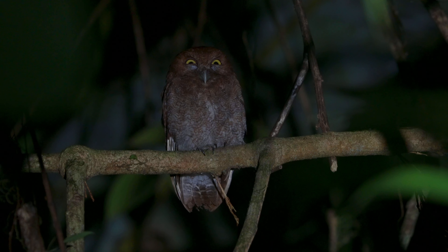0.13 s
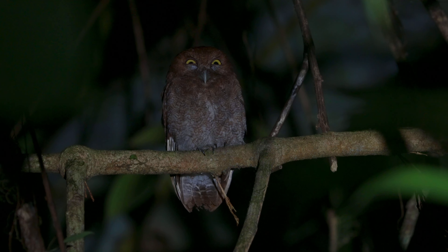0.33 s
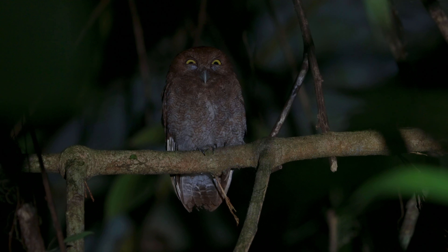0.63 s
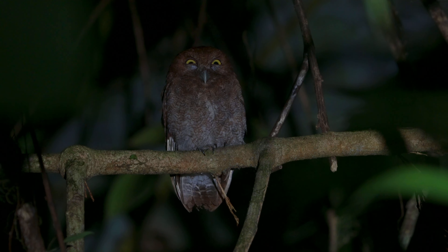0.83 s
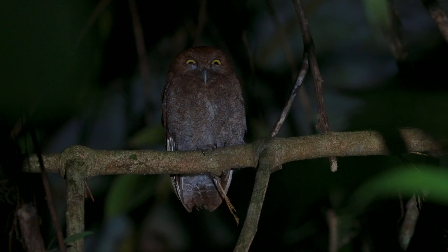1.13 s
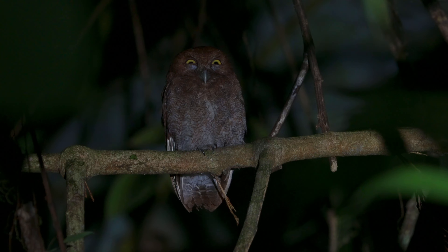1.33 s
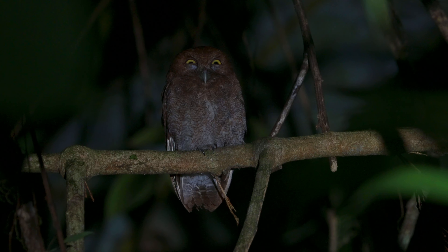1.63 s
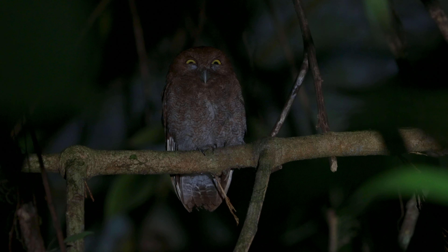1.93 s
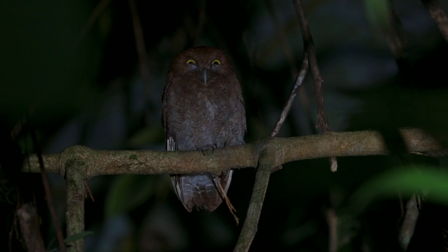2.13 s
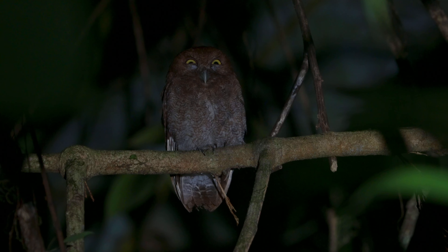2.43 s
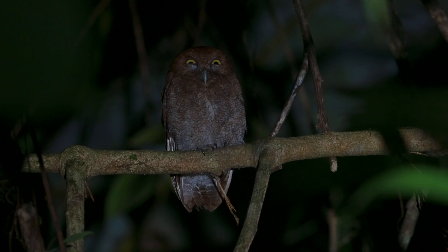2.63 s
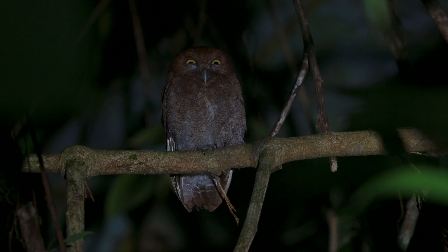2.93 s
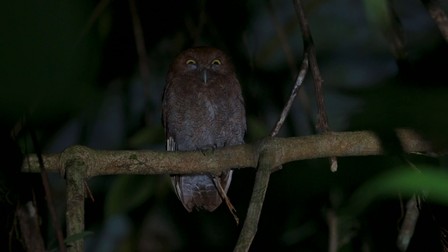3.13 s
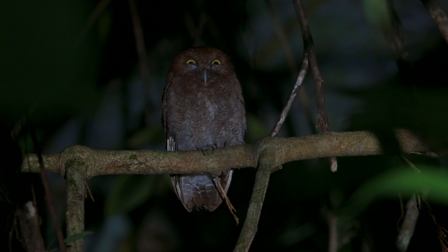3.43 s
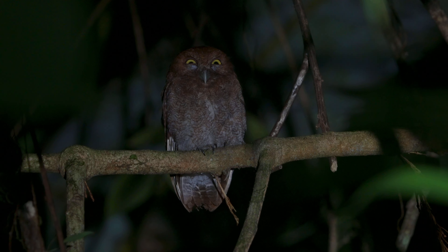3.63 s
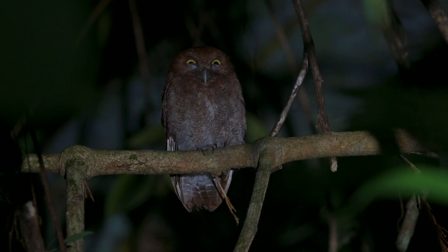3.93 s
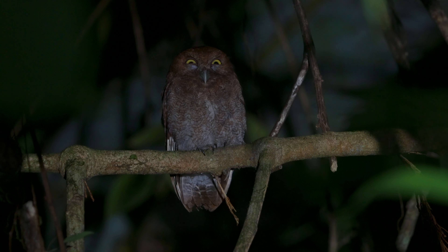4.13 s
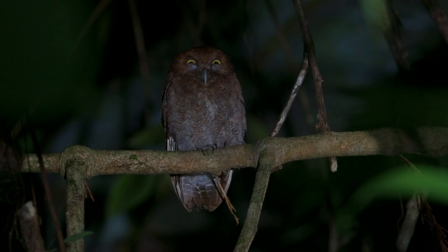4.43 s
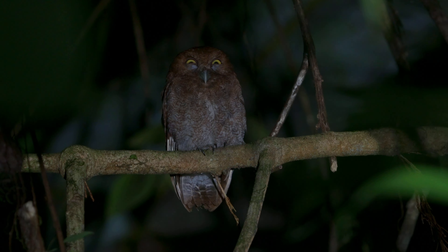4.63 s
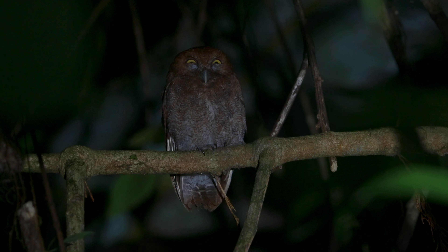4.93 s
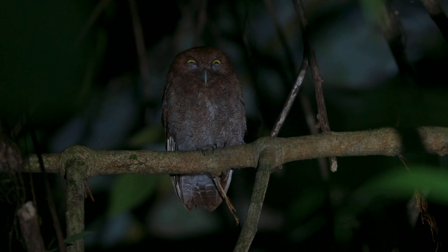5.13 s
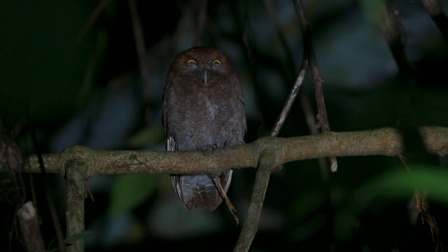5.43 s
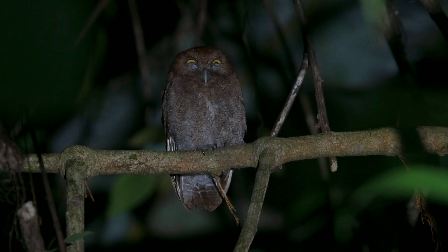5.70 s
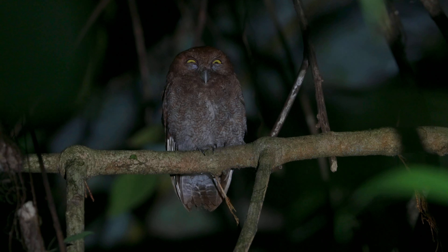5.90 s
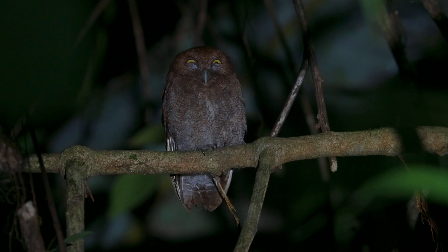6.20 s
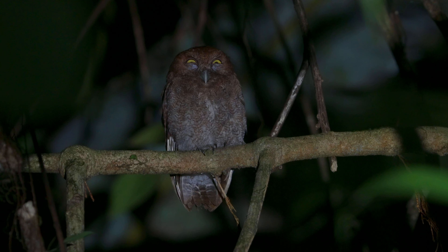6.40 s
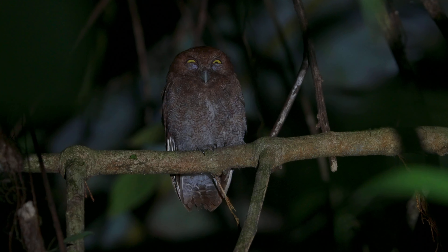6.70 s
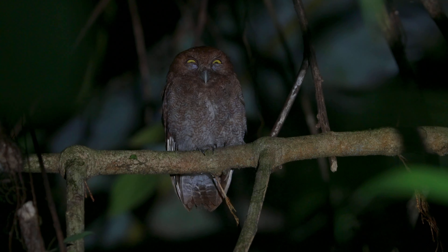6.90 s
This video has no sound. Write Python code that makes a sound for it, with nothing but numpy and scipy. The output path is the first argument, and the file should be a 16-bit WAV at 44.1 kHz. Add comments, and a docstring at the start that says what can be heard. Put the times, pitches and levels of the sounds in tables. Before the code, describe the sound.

A night forest rings with a dense, high, fluttering chorus of far crickets. Nearer crickets add brief pure trills that overlap irregularly on both sides, and thin, very high buzzes rise among them. Faint quavering bird notes come through the trees. From about three seconds a katydid on the right chirps in short, rough bursts, loudest and most regular toward the end. Wide stereo outdoors, with leafy scatter and a low hush; the perched owl stays silent.

```python
"""Tropical forest at night

Far crickets, summed noise bands with fluttering level, shimmer between 4 and 8 kHz.
Nearer crickets trill: pure wing tones chopped by wing beats. A slow far one repeats sliding notes.
A katydid on the right sweeps its pitch in short chirps; others make very high, rising, noise-blurred buzzes.
A far bird whistles faintly in quavering sines, and twigs tick as decaying noise.
Random echo tails scatter these nearer voices over shaped noise: a low hush, a hum and a hiss."""
import sys
import numpy as np
from scipy import signal
from scipy.fft import rfft, irfft, next_fast_len
from scipy.io import wavfile
from scipy.ndimage import map_coordinates

SR = 44100
rng = np.random.default_rng(int(sys.argv[2]) if len(sys.argv) > 2 else 0)


def generate_wav(sig):
    """Save sig (samples, or channels by samples) to the path in sys.argv[1] as 16-bit PCM at SR."""
    pcm = np.round(np.clip(np.atleast_2d(sig).T, -1, 1) * 32767).astype(np.int16)
    wavfile.write(sys.argv[1], SR, pcm)


N = 311346  # samples

# hush spectrum: (frequency [Hz], relative level [dB])
AIR_SPECTRUM = [(12, -34), (20, -3.5), (133, -5), (461, -7.5), (536, -2), (596, -4.5), (724, -7.5),
                (1090, -9), (1380, -8), (1780, -11.5), (2680, -12), (3050, -15.5), (3400, -13.5),
                (4420, -43), (7480, -120)]
# hiss spectrum: (frequency [Hz], relative level [dB])
HISS_SPECTRUM = [(2500, -36), (3500, 7), (8200, 28.5), (9000, -35), (11000, 5.5), (14000, 7.5), (15000, -5)]
# far hum bands: (centre [Hz], spread [Hz], level [dB])
HUM_BANDS = [(541, 10.8, -69), (626, 21, -81.5), (1383, 31, -74)]
# hush likeness between ears: (frequency [Hz], left-right correlation [-1 to 1])
EAR_LIKENESS = [(30, .98), (80, 0.94), (170, 0.73), (350, 0.32), (800, 0.11), (3000, 0.015)]
# far cricket species: (wing tone [Hz], spread [Hz], mean level [dB], pulse rate [1/s])
FAR_SPECIES = [(3875, 96, -66, 35), (4100, 117, -60, 33), (4393, 73, -55, 54), (4603, 29, -48.5, 83),
               (4775, 61, -45, 78), (5060, 84, -47, 80), (5512, 100, -41, 47), (6110, 160, -49.2, 81),
               (6398, 89, -41.5, 19), (6618, 30, -41.7, 26), (6804, 34, -42, 47), (7010, 85, -39.7, 100),
               (7200, 160, -46, 150), (7530, 33, -46.3, 31), (7585, 129, -39, 28), (7710, 140, -51, 52),
               (8330, 17, -62.5, 40)]
# slow swell of the high far species, shape only: (time [s], level [dB])
HIGH_SWELL = [(0.0, -37), (0.37, -34.5), (2.32, -37.5), (2.44, -34.5), (3.13, -37.5), (3.6, -36),
              (7.06, -36.5)]
# bird whistles: (start [s], length [s], pitch [Hz], level [dB])
BIRD_WHISTLES = [(0.947, .48, 2720, -64.5), (1.216, .17, 4200, -51), (4.153, 0.16, 4200, -54),
                 (4.58, .15, 3780, -57.5), (4.848, 0.076, 2480, -58.5), (4.954, 0.054, 2466, -56),
                 (6.117, .3, 3804, -59)]
# twig ticks: (time [s], level at onset, before scatter [dB])
TWIG_TICKS = [(4.3, -56), (4.396, -42.5)]
# near crickets: (wing tone [Hz], pulse rate [1/s], pulse sharpness [-], pitch sag within a pulse [Hz],
# pitch jitter [Hz], left minus right [dB], scatter against direct [dB])
CRICKET_VOICES = [(5293, 99, 1.05, 15, 8, 3.5, -4), (5594, 107.5, 2.3, 42, 11, -3, -1),
                  (5570, 107.5, 2, 42, 22, -2, 3), (4825, 62, .7, 0, 18, 1, 0),
                  (7058, 52, .4, 0, 14, -1.5, -3), (6796, 47, .55, 0, 32, -2, 0),
                  (6179, 30, .3, 0, 22, -7, -2)]
# trill repeated by each near cricket: (length [s], level [dB], swell time [s])
CRICKET_TRILLS = [(0.293, -38, .012), (0.29, -36, 0.025), (.27, -40, 0.048), (.29, -45.5, .04),
                  (0.278, -40, 0.022), (.38, -44, .06), (.13, -46, .025)]
# one list of trills per near cricket, the last strictly periodic: (start [s])
TRILL_STARTS_S = [
    [-.2, .44, 1.77, 3.23, 3.96, 4.67, 5.65, 6.83],
    [.32, 1.92, 2.73, 3.38, 4.77, 5.76],
    [.2, 1.15, 2.07, 2.38, 4.35, 4.62, 6.58],
    [.55, 1.26, 2.65, 3.33, 5.3, 5.58, 6.5],
    [.51, 2.36, 3.65, 5.11, 6.5],
    [.25, 1.38, 2.42, 3.35, 3.8, 5, 5.48, 6.6],
    np.arange(start=.13, stop=N / SR, step=.667),
]
# high buzzes: (start [s], drive level [dB], singer)
BUZZ_EVENTS = [(-.17, -36, "two-toned"), (0.376, -58.5, "slow"), (1.171, -62, "slow"),
               (1.416, -54.5, "plain"), (1.597, -50, "shrill"), (2.252, -55, "slow"),
               (2.637, -51.5, "shrill"), (3.129, -38, "two-toned"), (3.52, -54.5, "shrill"),
               (4.108, -55, "slow"), (4.706, -59, "shrill"), (5.238, -57, "slow"), (5.268, -49, "shrill"),
               (5.838, -51, "shrill"), (6.352, -55.5, "slow"), (6.632, -38, "plain")]
# by singer: (buzz length [s], final pitch [Hz], upper wing mode [dB], pitch settling time [s])
BUZZ_SINGERS = {"two-toned": (0.276, 12269.5, -10.5, 0.07), "slow": (0.44, 12520, -18, 0.18),
                "shrill": (.3, 13330, -31, 0.03), "plain": (.33, 12300, -34, 0.17)}
# katydid chirps: (start [s], length [s], level before leaf echoes [dB])
KATYDID_CHIRPS = [(2.425, .11, -56), (3.041, .1, -39), (3.507, 0.21, -57.5), (3.836, 0.096, -37),
                  (4.096, .11, -34.5), (4.388, 0.095, -35), (4.915, 0.13, -26.5), (5.202, 0.11, -25),
                  (5.492, .11, -24.5), (5.779, .14, -24)]
# katydid wing cycle, closing on itself: (share of cycle [0 to 1], pitch offset [Hz], relative level [dB])
WING_CYCLE = [(.05, 500, -5.5), (.22, 267.5, -2), (.45, -130, -.5), (.68, -470, -4.5), (.8, -400, -4),
              (.97, 450, -9.5)]

WAVE_PEAK_S, WAVE_EVERY_S, WAVE_DB = 0.73, 0.694, 1.03  # low far species call together in slow waves
QUAVER_SHARE = 0.00703  # share of pitch, for the lowest whistle
QUAVER_POWER = 1.41  # power of pitch by which the share widens
# a harder stroke is faster, so higher
CHIRP_HZ, CHIRP_RISE_HZ_PER_DB = 9360, 19  # reference pitch at the loudest chirp
TOP_HZ = 15400


def amp(db):
    """Amplitude of a level in dB."""
    return 10 ** (np.asarray(db) / 20)


def unit(x):
    """x scaled to rms 1."""
    return x / np.sqrt(np.mean(np.abs(x) ** 2) + 1e-20)


def clock():
    """Time [s] of every sample."""
    return np.arange(N) / SR


def along(points, hz):
    """(frequency [Hz], value) points interpolated on a log axis."""
    point_hz, value = np.transpose(points)
    return np.interp(np.log(hz + 1), np.log(point_hz + 1), value)


def wobble(rate_hz):
    """Smooth random curve, rate_hz knots a second."""
    knots = rng.standard_normal(int(N * rate_hz / SR) + 4)
    coarse_s = clock()[::64]
    return np.interp(clock(), coarse_s, map_coordinates(knots, [coarse_s * rate_hz]))


def filtered(x, response):
    """x shaped by a function of frequency."""
    size = next_fast_len(N + 8192)
    spectrum = rfft(x, size) * response(np.fft.rfftfreq(size, 1 / SR))
    return irfft(spectrum, size)[..., :N]


def band(centre_hz, spread_hz, channels=2):
    """Noise around one pitch, as from many unrelated voices, rms 1."""
    noise = rng.standard_normal((channels, N))
    return unit(filtered(noise, lambda hz: np.exp(-((hz - centre_hz) / spread_hz) ** 2 / 4)))


def phase(hz):
    """Running phase [rad] of a pitch curve."""
    return 2 * np.pi * np.cumsum(hz) / SR


def pulses(rate_hz, sharpness, drift):
    """Wing-beat loudness at a slightly unsteady rate, rms 1."""
    beat = np.cos(phase(rate_hz * (1 + drift * wobble(9))))
    return unit(np.exp(sharpness * beat))


def gate(start_s, length_s, rise_s, fall_s):
    """Envelope fading in from its start and out around its end."""
    t = clock()
    fade_in = np.clip((t - start_s) / rise_s, 0, 1)
    return fade_in * np.clip((start_s + length_s - t) / fall_s + .5, 0, 1)


def pan(side_db):
    """Constant-power gains for a left-minus-right level."""
    return np.sqrt(2) * np.array([[amp(side_db)], [1]]) / np.hypot(amp(side_db), 1)


def forest(x, side_db, wet_db, t60_s):
    """Direct sound plus scatter, dense from near leaves and long from trunks, at the same total power."""
    t = np.arange(SR) / SR
    decay = amp(-60 * t / t60_s) + 1.7 * amp(-60 * t / 0.039)
    tail = rng.standard_normal((2, SR)) * decay
    echo = signal.fftconvolve(x[None], tail, axes=1)[:, :N]
    echo *= np.std(x) / np.std(echo, axis=1, keepdims=True)
    return (pan(side_db) * x + amp(wet_db) * echo) / np.hypot(1, amp(wet_db))


def air():
    """Low noise hush, alike at both ears in the bass, with a far hum and a thin hiss."""
    def shape(hz):
        # mid-side split angle that yields the correlation
        angle = np.arccos(np.clip(along(EAR_LIKENESS, hz), -1, 1)) / 2
        return amp(along(AIR_SPECTRUM, hz)) * [np.cos(angle), np.sin(angle)]

    mid, side = filtered(rng.standard_normal((2, N)), shape)
    hush = unit(np.array([mid + side, mid - side]))
    hum = sum(amp(db) * band(hz, spread_hz) for hz, spread_hz, db in HUM_BANDS)
    hiss = unit(filtered(rng.standard_normal((2, N)), lambda hz: amp(along(HISS_SPECTRUM, hz))))
    return amp(-58.5) * hush + hum + amp(-50.5) * hiss


def chorus(drift_db=1.0, sharpness=0.11):
    """Each far species blurs into a narrow band; wing beats of its closest singers still flutter."""
    swell_s, swell_db = np.transpose(HIGH_SWELL)
    low_db = WAVE_DB * np.cos(2 * np.pi * (clock() - WAVE_PEAK_S) / WAVE_EVERY_S)
    high_db = .6 * np.interp(clock(), swell_s, swell_db - np.mean(swell_db))
    out = np.zeros((2, N))
    for hz, spread_hz, db, rate_hz in FAR_SPECIES:
        upper = np.interp(hz, [5000, 6300], [0, 1])  # 0: low species, 1: high
        level_db = db + (1 - upper) * low_db + upper * high_db + drift_db * wobble(8.3)
        out += amp(level_db) * band(hz, spread_hz) * pulses(rate_hz, sharpness, drift=0.0757)
    return out


def bird():
    """Thin quavering sines, mostly heard through the trees; higher whistles quaver more."""
    waver = wobble(130)
    lowest_hz = min(hz for _, _, hz, _ in BIRD_WHISTLES)
    song = np.zeros(N)
    for start_s, length_s, hz, db in BIRD_WHISTLES:
        quaver = QUAVER_SHARE * (hz / lowest_hz) ** QUAVER_POWER
        tone = np.sqrt(2) * np.sin(phase(hz * (1 + quaver * waver)))
        song += amp(db) * gate(start_s, length_s, rise_s=0.03, fall_s=0.062) * tone
    return forest(song * pulses(40, sharpness=0.16, drift=.05), side_db=-8, wet_db=6.0, t60_s=1.0)


def twigs():
    """Small dry ticks: noise with an instant onset and exponential decay."""
    t = clock()
    snap = sum(amp(db - 60 * np.abs(t - start_s) / 0.018) * (t > start_s) for start_s, db in TWIG_TICKS)
    return forest(snap * band(1400, 320, channels=1)[0], side_db=-6, wet_db=-3, t60_s=0.2)


def chirper(hz=6470, fall_hz=330, rate_hz=9.4, level_db=-43):
    """Slow far cricket: each wing closure is a short note sliding down, some louder than others."""
    beat = np.cumsum(rate_hz * (1 + 0.037 * wobble(3))) / SR % 1
    pitch_hz = hz - fall_hz * (beat - .5) + 35 * wobble(250)
    note = np.sin(np.pi * beat) ** 3 * np.sin(phase(pitch_hz))
    song = unit(note * amp(1.5 * wobble(4)))
    return amp(level_db) * forest(song, side_db=-6, wet_db=7, t60_s=.45)


def crickets(vary_db=-1.0):
    """Wing beats chop a wing tone into a comb of lines; the tone sags while the scraper drags."""
    out = np.zeros((2, N))
    for voice, song, starts_s in zip(CRICKET_VOICES, CRICKET_TRILLS, TRILL_STARTS_S):
        hz, rate_hz, sharpness, sag_hz, jitter_hz, side_db, wet_db = voice
        length_s, db, swell_s = song
        gates = sum(gate(start_s, length_s, rise_s=swell_s, fall_s=0.032) for start_s in starts_s)
        effort = amp(db + vary_db * wobble(1.4)) * gates
        beat = np.cos(phase(rate_hz * (1 + .008 * wobble(14))))
        pitch_hz = hz - sag_hz * beat + 4 * wobble(5) + jitter_hz * wobble(120)
        tone = np.sin(phase(pitch_hz))
        trill = effort * unit(tone * np.exp(sharpness * beat) * amp(0.63 * wobble(40)))
        out += forest(trill, side_db, wet_db, t60_s=.45)
    return out


def tooth_blur(spread_hz, skirt):
    """Complex noise around 0 Hz: uneven tooth strikes blurring a tone."""
    centre_hz = SR / 4
    core = band(centre_hz, spread_hz, channels=1)[0]
    noise = core + skirt * band(centre_hz, 560, channels=1)[0]
    return signal.hilbert(noise) * np.exp(-2j * np.pi * centre_hz * clock())


def buzzers(spread_hz=200, skirt=0.31, upper_hz=1120, climb_hz=1050):
    """Each buzz swells and climbs to its pitch as the wings speed up; an upper wing mode adds a tone."""
    t, out = clock(), np.zeros(N)
    main = tooth_blur(spread_hz, skirt)
    upper = tooth_blur(spread_hz, skirt) * np.exp(2j * np.pi * upper_hz * t)
    for start_s, db, singer in BUZZ_EVENTS:
        length_s, final_hz, upper_db, settle_s = BUZZ_SINGERS[singer]
        effort = gate(start_s, length_s, rise_s=0.073, fall_s=0.16)
        on = effort > 0
        turn = phase(final_hz - climb_hz * np.exp(-(t[on] - start_s) / settle_s))
        modes = main[on] + amp(upper_db) * upper[on]
        out[on] += amp(db) * effort[on] * np.real(modes * np.exp(1j * turn))
    return forest(out * pulses(98, sharpness=0.23, drift=0.13), side_db=5, wet_db=4, t60_s=0.71)


def katydid(rate_hz=39.5, scrape_db=-15):
    """Chirps of a few swelling wing cycles; in each the tone slides down the file and swings back up."""
    t, out = clock(), np.zeros(N)
    share, offset_hz, stroke_db = np.transpose(WING_CYCLE)
    jitter_hz = 170 * wobble(1100)
    loudest_db = max(db for _, _, db in KATYDID_CHIRPS)
    for start_s, length_s, db in KATYDID_CHIRPS:
        effort = gate(start_s, length_s, rise_s=0.061, fall_s=0.019)
        on = effort > 0
        beat = (t[on] - start_s) * rate_hz * (1 + .03 * rng.standard_normal())
        middle_hz = CHIRP_HZ + CHIRP_RISE_HZ_PER_DB * (db - loudest_db)
        hz = middle_hz + np.interp(beat, share, offset_hz, period=1)
        tone = np.sqrt(2) * np.sin(phase(hz + jitter_hz[on]))
        level_db = db + np.interp(beat, share, stroke_db, period=1)
        out[on] += amp(level_db) * effort[on] ** 0.62 * tone
    # uneven teeth roughen the tone
    out *= 1 + amp(scrape_db) * band(460, 290, channels=1)[0]
    # near leaves return the sweep a few ms late, so it beats against itself
    leaves = sum(0.44 * np.roll(out, round(delay_s * SR)) for delay_s in rng.uniform(.001, 0.013, 5))
    return forest(0.83 * (out + leaves), side_db=-19.0, wet_db=-3.5, t60_s=0.6)


def scene():
    """All layers, background first."""
    return air() + chorus() + bird() + twigs() + chirper() + crickets() + buzzers() + katydid()


def record(dry):
    """Band limit: nothing passes at or above TOP_HZ."""
    return filtered(dry, lambda hz: hz < TOP_HZ)


dry = scene()
out = record(dry)
generate_wav(out)
```